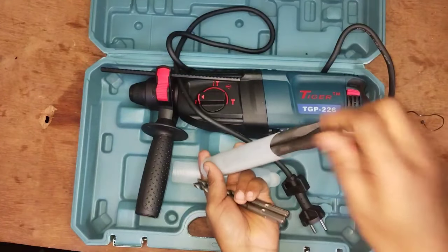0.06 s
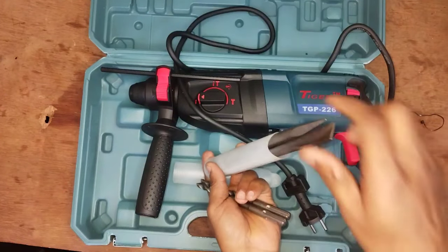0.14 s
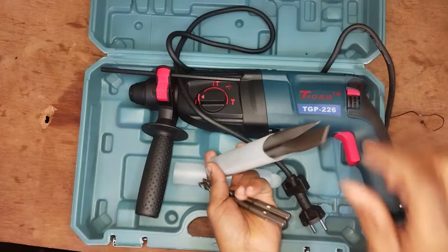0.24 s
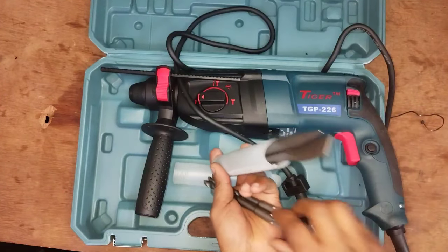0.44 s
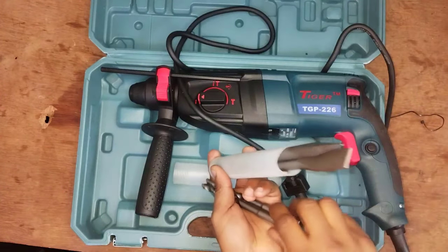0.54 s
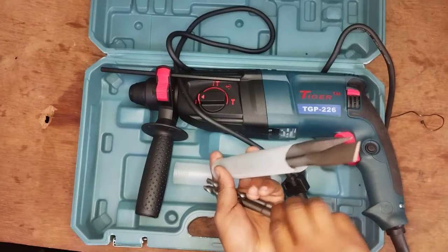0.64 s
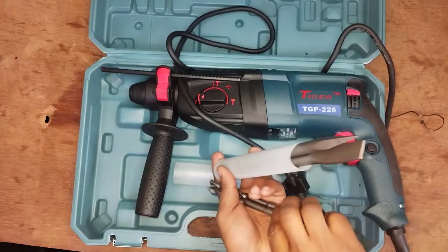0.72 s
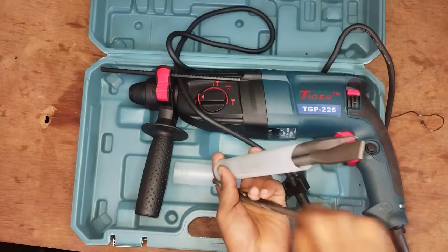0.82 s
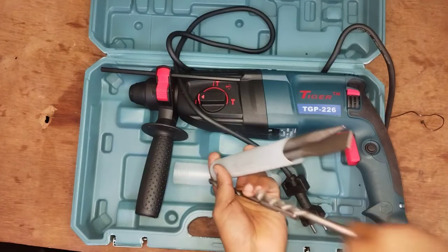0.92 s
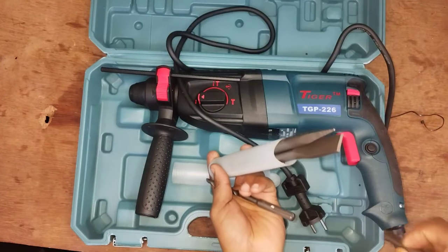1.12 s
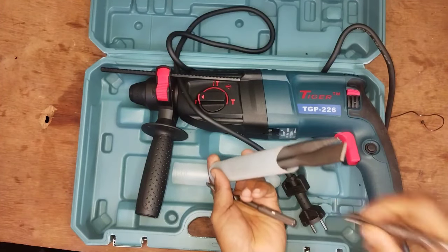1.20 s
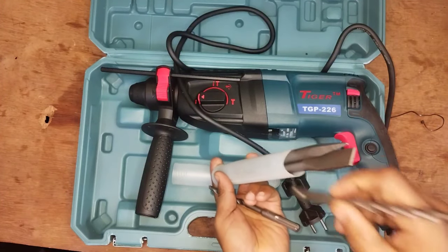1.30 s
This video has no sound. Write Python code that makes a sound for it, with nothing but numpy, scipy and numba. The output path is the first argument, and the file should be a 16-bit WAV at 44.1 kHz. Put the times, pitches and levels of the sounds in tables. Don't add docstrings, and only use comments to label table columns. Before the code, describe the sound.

Steel drill bits and a chisel clink in a palm in a burst of bright, dense clatter, then a tiny nail tick and a quieter scraping clink as one bit slides out; close phone microphone, small quiet room.

```python
import sys
import numpy as np
from scipy import signal
from scipy.fft import rfft, irfft
from scipy.io import wavfile
from scipy.ndimage import uniform_filter1d
from numba import njit

SR = 44100
rng = np.random.default_rng(int(sys.argv[2]) if len(sys.argv) > 2 else 0)


def generate_wav(signal):
    frames = np.transpose(np.atleast_2d(signal))
    scaled = np.clip(frames, -1, 1) * 32767
    pcm = np.round(scaled).astype(np.int16)
    wavfile.write(sys.argv[1], SR, pcm)


def gain_from_db(level_db):
    decades = np.asarray(level_db, float) / 20
    return 10 ** decades


N = 59535

# (frequency [Hz], level [dB])
AIR_COLOUR = [(12, -26), (20, 10), (68, 5), (141, -18.5), (252, -14), (1140, -24.5), (4500, -36.5),
              (8200, -34.5), (15600, -40.5)]
AIR_DB = -54.5
ROOM_T60_S, ROOM_DB = 0.22, -10

# (start [s], length [s], level [dB])
RUSTLE = [
    (0.553, .12, -70),
    (1.032, .06, -71),
    (-0.4, .19, -72.5),
    (0.79, .12, -75),
    (2.4, .5, -76.5),
]
RUSTLE_HZ, RUSTLE_WIDTH_HZ = 8630, 4200
# (start [s], length [s], level [dB])
HANDLING = [
    (-.06, .13, -66),
    (.41, 0.092, -66.5),
    (.86, .1, -72.5),
    (1.03, .07, -70),
    (1.16, .1, -74),
    (1.25, 0.15, -71),
]
# (frequency [Hz], level [dB])
HANDLING_COLOUR = [(120, -13), (300, -5), (600, 3), (1200, -5), (2500, -19.5)]

# (time [s], loss [dB])
CHOKES = [
    (0.132, -5.5),
    (0.167, -5.5),
    (.331, -8),
    (.3395, -9),
    (.357, -5),
    (.3835, -8.5),
    (0.399, -8),
    (0.43, -14),
    (.968, -5),
]
CHOKE_S = 0.0019

# (time [s], level [dB])
SETTLE_RUB = [(.088, -43), (.165, -61.5), (.18, -51.5), (.228, -56), (.24, -43), (.33, -45.5),
              (.345, -38.5), (.40, -49), (.47, -88)]
# (time [s], level [dB])
PICK_RUB = [
    (.785, -80),
    (.83, -69),
    (.855, -65),
    (.87, -56.5),
    (.92, -61),
    (.98, -89),
]
# (time [s], level [dB])
TOUCH_RUB = [
    (.669, -60),
    (.695, -77),
]
RATTLES_PER_S, RATTLE_SPREAD_DB, RATTLE_RING_DB = 2300, 3.5, -22.5
RUB_SHARE_DB = dict(sleeve=-60, bend=-2.5)

MODE_HZ = dict(chisel=[7030, 7295, 7339, 7413, 7449, 7482, 7557],
           thick=[7734, 7845, 7873, 8177, 13860, 13960], shank=[11515, 11584, 11717, 13290, 14800],
           long=[6075, 6335, 9596, 9790, 10010, 11230, 12960], sleeve=[160, 270, 456, 520, 640],
           bend=[1050, 1250, 1460, 1570, 1660], bend2=[2990, 3310, 3335, 3483, 3650],
           bend3=[4620, 4875, 4940], thin=[4285, 4990, 8460, 8500, 8870, 12815],
           small=[4670, 4713, 4765, 7975, 8075], twist=[4225, 4580, 8255, 8328, 10200, 13590],
           low=[1345, 1590, 1667], root=[1672], tip=[4340, 4385, 4520, 4980],
           point=[6300, 8260, 8445, 8480, 8880])
# (level [dB], T60 [s])
MODE_RING = dict(chisel=[(-16, 0.058), (-10, .06), (-10, .15), (-0.5, 0.35), (-14, .25), (-4.5, .1),
             (-12, 0.11)], thick=[(-12, .08), (-7.5, 0.18), (-1, .15), (-15.5, .1), (-22.5, 0.22),
             (-17.5, .26)], shank=[(-21.5, 0.16), (0.5, 0.45), (-0.5, 0.22), (-11, .09), (-13.5, 0.19)],
             long=[(-4.5, 0.043), (-2, .14), (-3.5, 0.2), (-2.5, 0.29), (-17, 0.15), (-7.5, 0.11),
             (-18.5, 0.12)], sleeve=[(-14.5, 0.045), (-13.5, .04), (0.5, 0.099), (-5.5, 0.032), (-9, 0.03)],
             bend=[(-8, 0.033), (-3.5, 0.025), (-7.5, 0.031), (2.5, 0.064), (-2, 0.034)], bend2=[(-5.5, .1),
             (-2, .15), (-3.5, .2), (-7.5, .2), (-2, 0.072)], bend3=[(0.5, .04), (1, 0.11), (-5.5, 0.11)],
             thin=[(-17.5, 0.051), (-19, 0.028), (0, 0.071), (-6.5, 0.07), (-13, 0.037), (-18, 0.15)],
             small=[(-13, 0.046), (-1.5, 0.24), (-17, 0.042), (0, 0.06), (-2, 0.1)], twist=[(-15, 0.052),
             (-24, 0.035), (0.5, 0.075), (0, 0.088), (-6.5, 0.0098), (-12, 0.082)], low=[(-10, 0.18),
             (-4.5, 0.16), (-2.5, 0.07)], root=[(0, 0.052)], tip=[(-7, 0.088), (0, 0.14), (0, 0.03),
             (-2, .05)], point=[(-14, .03), (-5, .06), (-1, 0.092), (0.5, 0.15), (-4, .04)])
GRIP_T60_S = 0.26
CONTACT_CYCLES, CONTACT_S = 1.2, 0.00033
SCATTER_DB = 2.5
SLEEVE_KEEP = 0.64
# (frequency [Hz], level [dB])
TICK_COLOUR = [(200, -6.5), (1000, 1), (2500, 4), (5000, 4), (8000, 12), (12000, 0.5), (15500, -10)]
TICK_S = 0.0016

# (time [s], chisel [dB], thick bit [dB], shank [dB], long bit [dB])
HANDFUL = [(0.0884, -25.5, -32.5, -40, -24.5), (0.0968, -25, -41, -41.5, -26),
           (0.1044, -37, -31.5, -48, -32.5), (0.1175, -42.5, -38, -52.5, -33.5),
           (0.1435, -45.5, -39.5, -51, -46), (0.1755, -39, -44, -48, -53), (0.1946, -44, -47, -37, -52.5),
           (0.1985, -40.5, -46, -36, -49.5), (0.2146, -38.5, -48, -41.5, -55),
           (0.2244, -35.5, -46, -37, -50.5), (0.2338, -25.5, -24.5, -20.5, -23.5),
           (0.2379, -17, -10.5, -16.5, -17), (0.2412, -14, -14.5, -5.5, -16), (0.2453, -13, -25, -14, -22),
           (0.2558, -9.5, -24.5, -9, -23.5), (0.2635, -15, -24, -16.5, -24.5),
           (0.2728, -9, -11, -16.5, -30), (0.2875, -9.5, -15, -16.5, -22.5),
           (0.3009, -13.5, -21, -20, -27.5), (0.3092, -11.5, -17, -22, -31),
           (0.3185, -15.5, -20.5, -20, -35.5), (0.3403, -10.5, -20, -29.5, -19.5),
           (0.3468, -20.5, -27.5, -35, -23), (0.3535, -20, -30.5, -35, -31),
           (0.361, -28, -34.5, -38, -23.5), (0.3705, -21.5, -31.5, -28, -38),
           (0.3742, -19, -12.5, -29.5, -30), (0.3935, -25.5, -33, -36.5, -32.5),
           (0.4035, -39, -41, -45.5, -46), (0.413, -30, -43, -44, -36), (0.4251, -35.5, -43.5, -47, -38),
           (0.452, -56, -60, -65, -50.5), (0.482, -58, -63, -77, -59)]
# (time [s], sleeve [dB], first, second and third bending cluster [dB])
BUMPS = [(0.0884, -59.5, -54.5, -46.5, -32.5), (0.0968, -58.5, -44, -45.5, -43.5),
         (0.137, -63.5, -47.5, -43.5, -57.5), (0.178, -60, -47, -48.5, -54.5),
         (0.24, -28, -24.5, -21.5, -31.5), (0.252, -37, -25, -31.5, -49), (0.272, -40, -29, -29.5, -37.5),
         (0.287, -48, -39.5, -21.5, -28), (0.299, -48.5, -37.5, -23.5, -24.5),
         (0.314, -36.5, -38.5, -25, -33.5), (0.341, -25, -37, -33, -25), (0.354, -37, -40.5, -34, -37.5),
         (0.375, -43, -47.5, -32, -54.5), (0.394, -37, -40.5, -36, -46.5), (0.426, -42, -47, -48.5, -69),
         (0.462, -60, -57.5, -59, -71), (0.481, -63, -70, -66, -53.5)]
# (time [s], thin bit [dB], small bit [dB], their low bending [dB], twisted bit [dB])
PICK = [(0.8046, -70, -57, -53.5, -82), (0.812, -77, -57, -71, -82), (0.827, -70, -45, -57, -74),
        (0.8365, -40, -41, -59, -72), (0.8608, -28.5, -40, -58, -37), (0.8692, -20.5, -23.5, -71, -29),
        (0.8745, -24.5, -30.5, -64, -27), (0.8825, -55, -38, -55, -21), (0.8875, -26.5, -36, -49, -25),
        (0.8962, -24, -45, -62, -34), (0.9044, -34, -33, -68, -39.5), (0.9187, -37, -37, -54, -36),
        (0.9235, -37, -43, -53, -35), (0.9325, -40, -44.5, -56, -43), (0.9504, -49, -47, -78, -50),
        (0.9545, -69, -46.5, -74, -61)]
# (time [s], low bending [dB], bit tip [dB], bit point [dB], bare tick [dB])
TOUCH = [
    (.583, -64, -78, -73, -90),
    (.6682, -60, -50, -49.5, -46.5),
    (.69, -79, -59, -66, -69),
    (.716, -82, -66, -60, -85),
    (.76, -84, -71, -78, -90),
    (1.04, -72, -81, -76, -77),
    (1.326, -87.5, -84, -68, -90),
]


def coloured(points):
    points = np.array(points)
    hz = np.maximum(np.arange(N // 2 + 1) * SR / N, 1)
    gain = gain_from_db(np.interp(np.log(hz), np.log(points[:, 0]), points[:, 1]))
    noise = irfft(rfft(rng.standard_normal(N)) * gain, N)
    return noise / np.std(noise)


def air():
    return gain_from_db(AIR_DB) * coloured(AIR_COLOUR)


def room(x):
    t = np.arange(SR // 2) / SR
    tail = rng.standard_normal(len(t)) * 1000 ** (-t / ROOM_T60_S) * (t > .002)
    tail = signal.lfilter([1], [1, -.3], tail)
    tail = tail / np.sqrt(np.sum(tail ** 2))
    return x + gain_from_db(ROOM_DB) * signal.fftconvolve(x, tail)[:N]


def swell(strokes):
    t = np.arange(N) / SR
    return sum(gain_from_db(db) * np.sin(np.pi * np.clip((t - start) / length, 0, 1)) for start, length, db in strokes)


def fingers():
    low_edge_hz = RUSTLE_HZ - RUSTLE_WIDTH_HZ / 2
    bright = coloured([(1500, -14), (low_edge_hz, -4), (RUSTLE_HZ, 0), (14000, -8)])
    return swell(RUSTLE) * bright + swell(HANDLING) * coloured(HANDLING_COLOUR)


def chokes():
    t = np.arange(N) / SR
    loss_db = sum(db * (np.abs(t - at) < CHOKE_S / 2) for at, db in CHOKES)
    return gain_from_db(loss_db / (CHOKE_S * SR))


def rattle(curve):
    curve, t = np.array(curve), np.arange(N) / SR
    happens = rng.random(N) < RATTLES_PER_S / SR
    size = gain_from_db(RATTLE_SPREAD_DB * rng.exponential(size=N))
    ticks = happens * np.sign(rng.standard_normal(N)) * size
    level_db = np.interp(t, curve[:, 0], curve[:, 1], left=-200, right=-200)
    return ticks / np.std(ticks) * gain_from_db(level_db)


@njit
def ring(push, keep, pole, soft):
    y, mode, contact = np.empty(len(push)), 0j, 0j
    for i in range(len(push)):
        contact = contact * soft + push[i] * (1 - abs(soft)) + 1e-18
        mode = mode * pole * keep[i] + contact
        y[i] = mode.imag
    return y


def rod(name, times, hit_db, rub, share):
    at = (np.asarray(times) * SR).astype(int)
    luck = rng.standard_normal((len(at), len(MODE_HZ[name]), 2))
    log_keep = np.zeros(N)
    log_keep[at] = np.log(share)
    width = int(CONTACT_S * SR)
    keep = np.exp(uniform_filter1d(log_keep, width, origin=width // 2 - 1)) * chokes()
    out = 0
    for k, (hz, (db, t60)) in enumerate(zip(MODE_HZ[name], MODE_RING[name])):
        push = rub * rng.standard_normal(N) * gain_from_db(RATTLE_RING_DB)
        scatter_db = SCATTER_DB * np.tanh(luck[:, k, 0])
        push[at] += gain_from_db(hit_db + scatter_db) * np.sign(luck[:, k, 1])
        turn = 2j * np.pi * hz / SR
        pole = np.exp(turn - np.log(1000) / (min(t60, GRIP_T60_S) * SR))
        soft = np.exp(turn - hz / SR / CONTACT_CYCLES)
        out = out + gain_from_db(db) * ring(push, keep, pole, soft)
    return out


def contact_ticks(rows, first_column, rub, tick_db, grit_db, cut_hz):
    strike = np.abs(rub) * gain_from_db(grit_db)
    energy = np.sum(gain_from_db(2 * rows[:, first_column:]), axis=1)
    strike[(rows[:, 0] * SR).astype(int)] += gain_from_db(tick_db) * np.sqrt(energy)
    envelope = signal.lfilter([1], [1, -np.exp(-1 / (TICK_S * SR))], strike)
    high_pass = signal.butter(2, cut_hz, "high", fs=SR, output="sos")
    return signal.sosfilt(high_pass, envelope * coloured(TICK_COLOUR))


def clinks(table, rods, rub, share, tick_db, grit_db, cut_hz):
    rows = np.array(table)
    out = 0
    for k, name in enumerate(rods):
        rod_rub = rub * gain_from_db(RUB_SHARE_DB.get(name, 0))
        kept = SLEEVE_KEEP if name == "sleeve" else share
        out = out + rod(name, rows[:, 0], rows[:, k + 1], rod_rub, kept)
    first_column = 1 + len(rods) if len(rods) < 4 else 1
    return out + contact_ticks(rows, first_column, rub, tick_db, grit_db, cut_hz)


def scene():
    settle = rattle(SETTLE_RUB)
    handful = clinks(HANDFUL, ["chisel", "thick", "shank", "long"], settle, 0.55,
                     tick_db=-18.5, grit_db=-13.5, cut_hz=1100)
    bumps = clinks(BUMPS, ["sleeve", "bend", "bend2", "bend3"], settle * gain_from_db(-1.0), 0.14,
                   tick_db=-1.5, grit_db=-30, cut_hz=130)
    drawn_bit = clinks(PICK, ["thin", "small", "low", "twist"], rattle(PICK_RUB) * gain_from_db(3.5), 0.68,
                       tick_db=-21.5, grit_db=-19, cut_hz=860)
    touches = clinks(TOUCH, ["root", "tip", "point"], rattle(TOUCH_RUB), 0.86,
                     tick_db=3, grit_db=-19, cut_hz=2430)
    near = handful + bumps + drawn_bit + touches + fingers()
    return (room(near) + air())[None]


def top_cut(x):
    return signal.sosfilt(signal.butter(12, 15740, fs=SR, output="sos"), x)


def record(dry):
    limit, top_hz = 0.9, 15700
    rounded = limit * np.tanh(dry / limit)
    low_pass = signal.ellip(8, .2, 60, top_hz, fs=SR, output="sos")
    return top_cut(signal.sosfilt(low_pass, rounded))


dry = scene()
out = record(dry)
generate_wav(out)
```